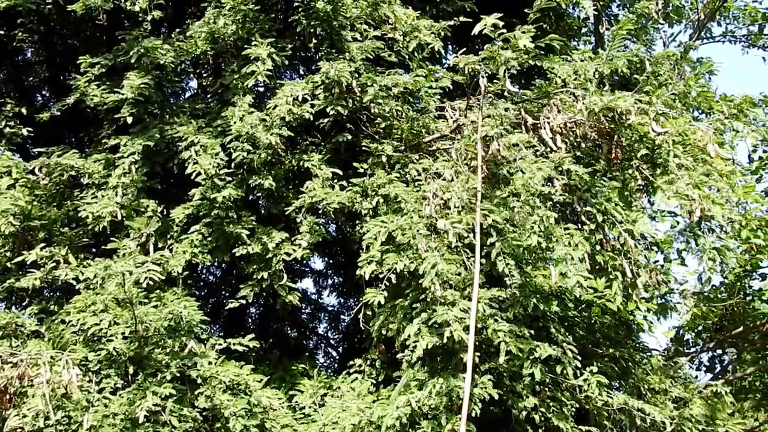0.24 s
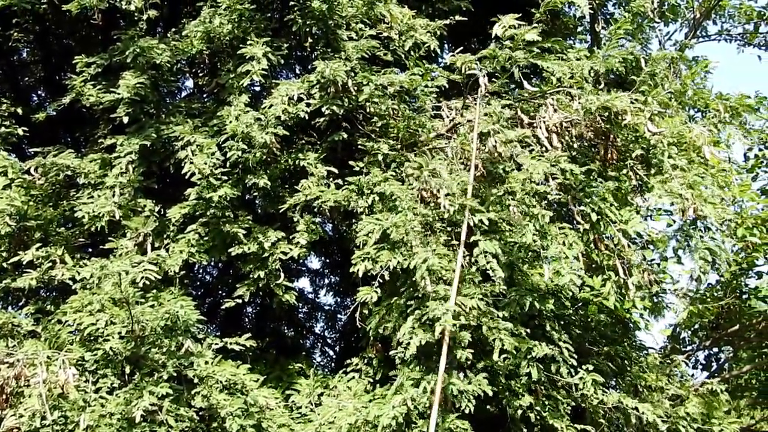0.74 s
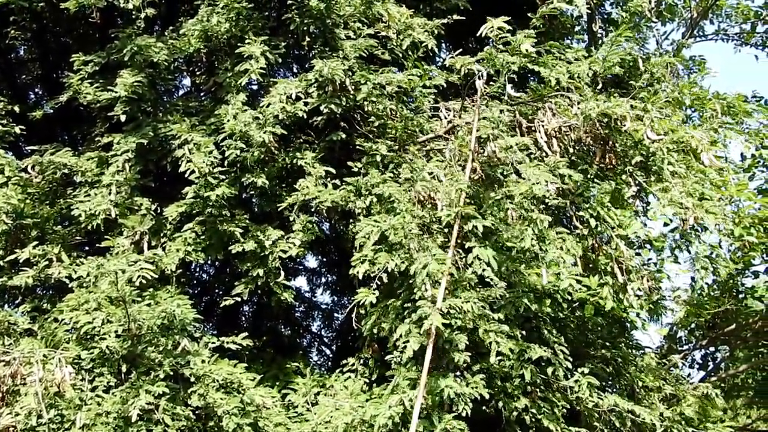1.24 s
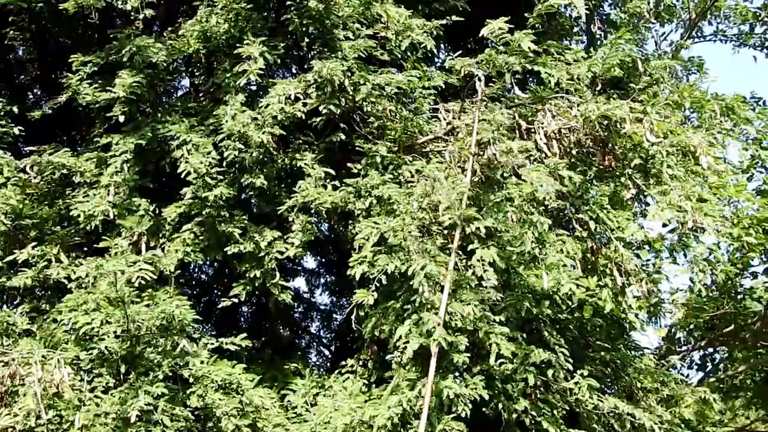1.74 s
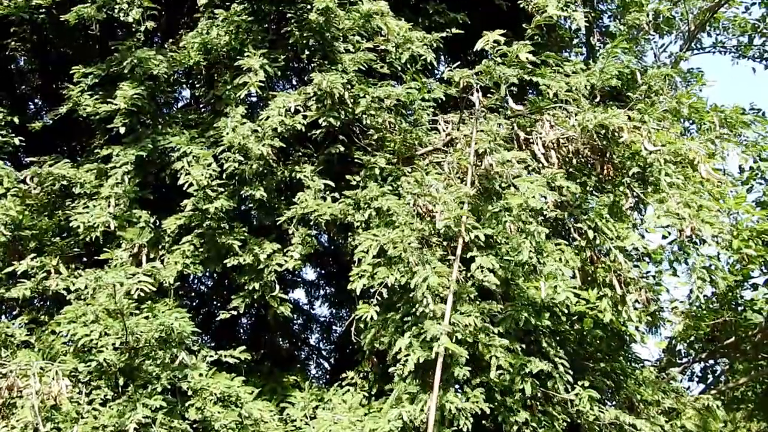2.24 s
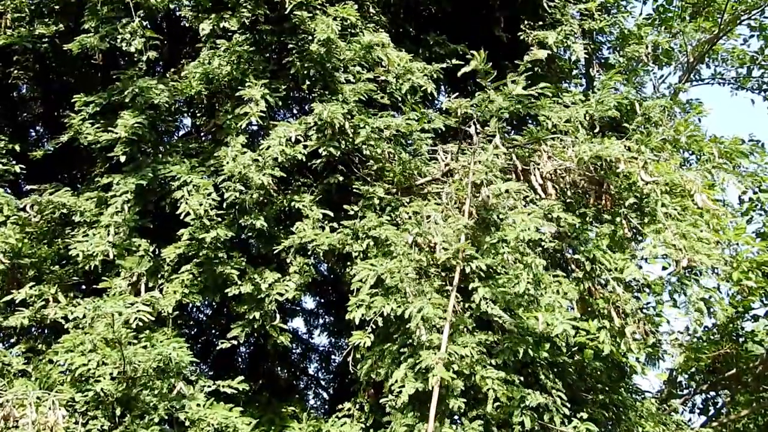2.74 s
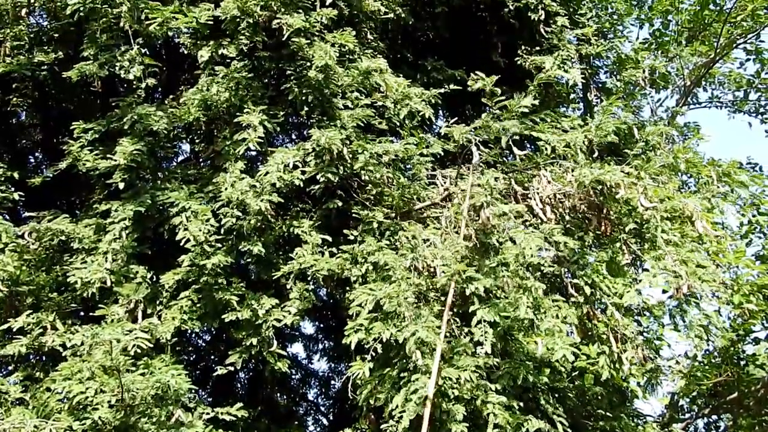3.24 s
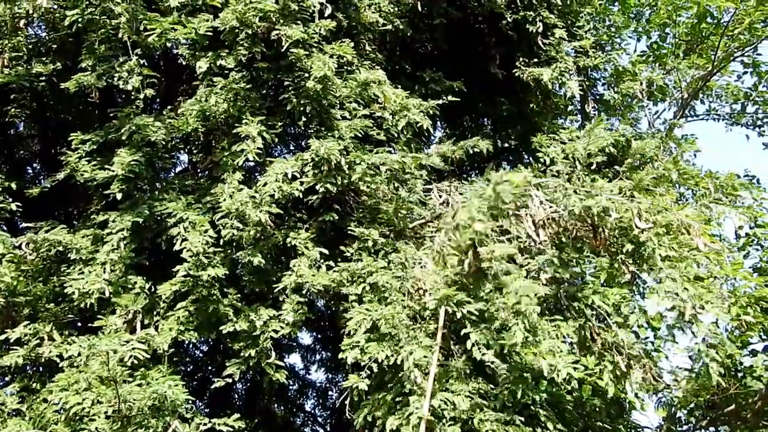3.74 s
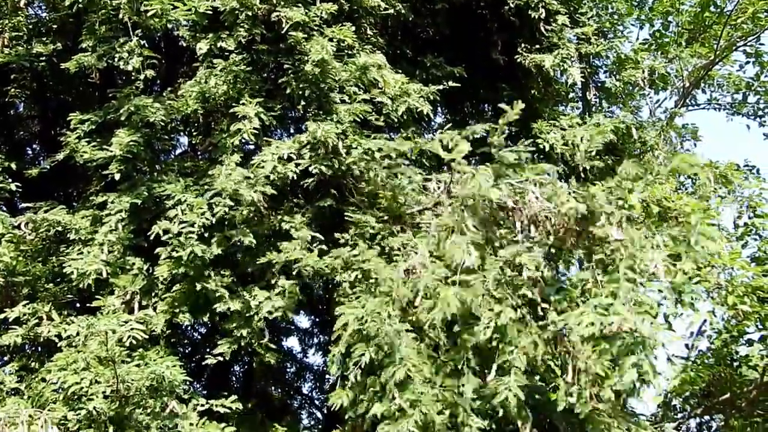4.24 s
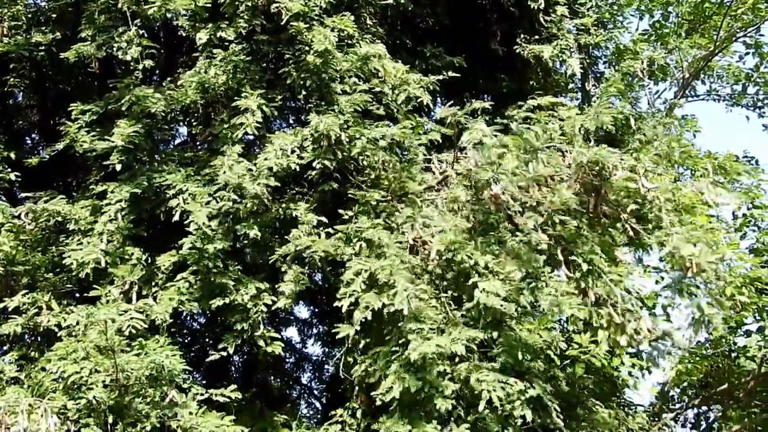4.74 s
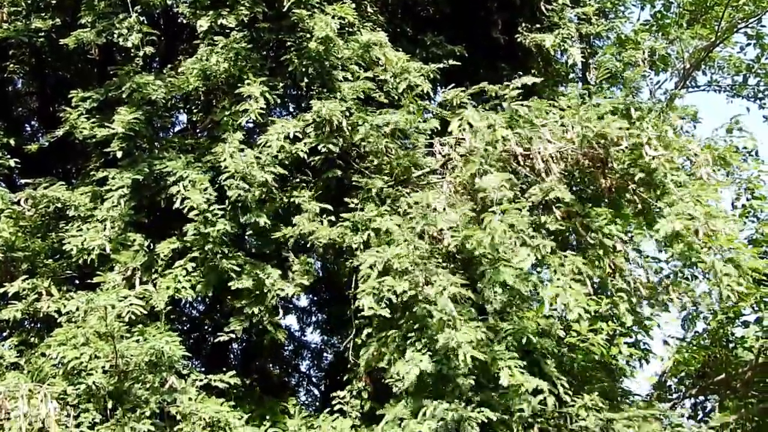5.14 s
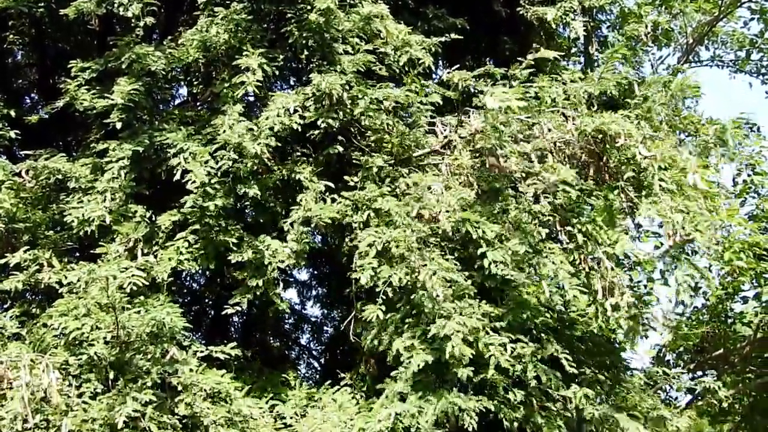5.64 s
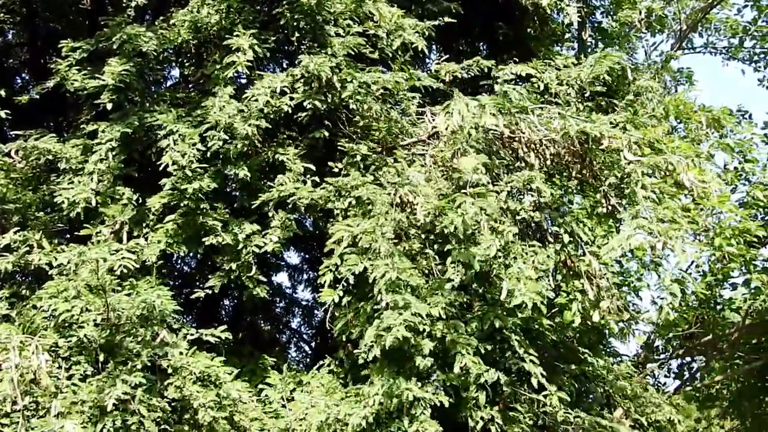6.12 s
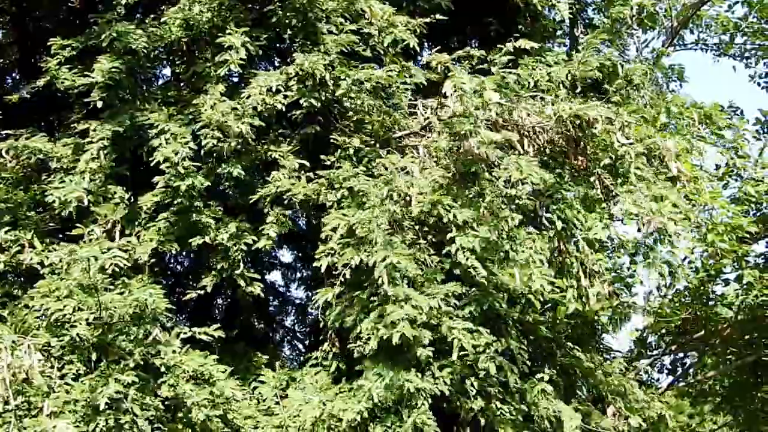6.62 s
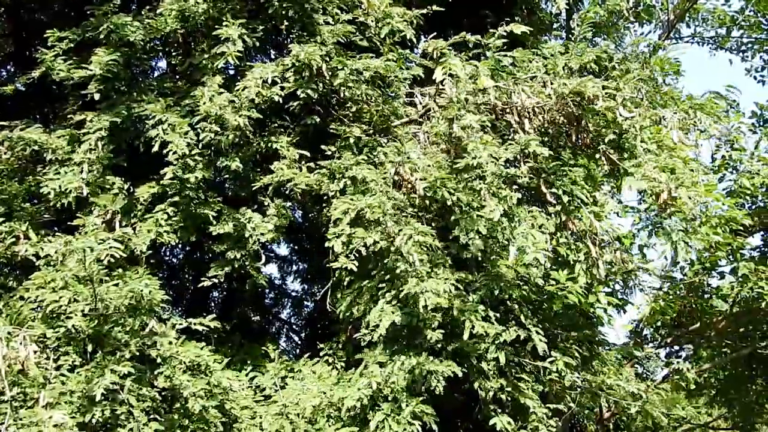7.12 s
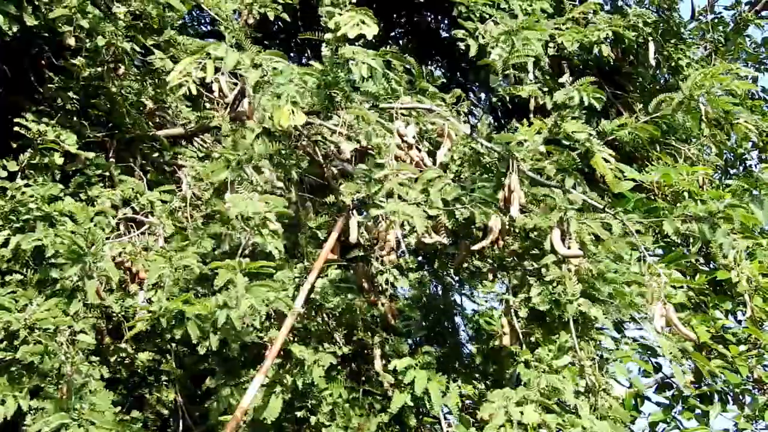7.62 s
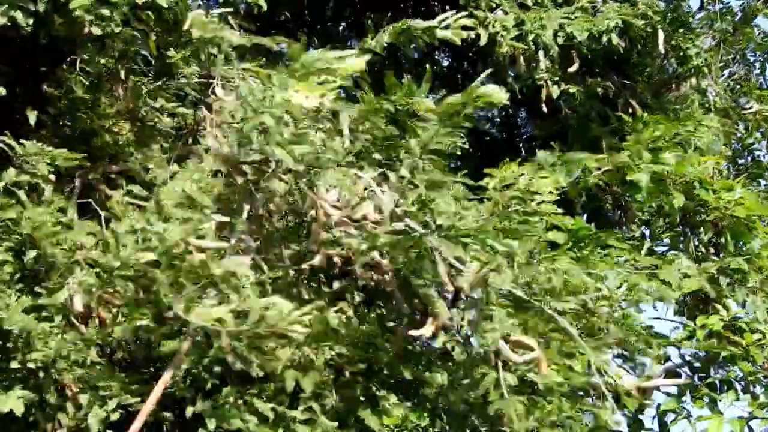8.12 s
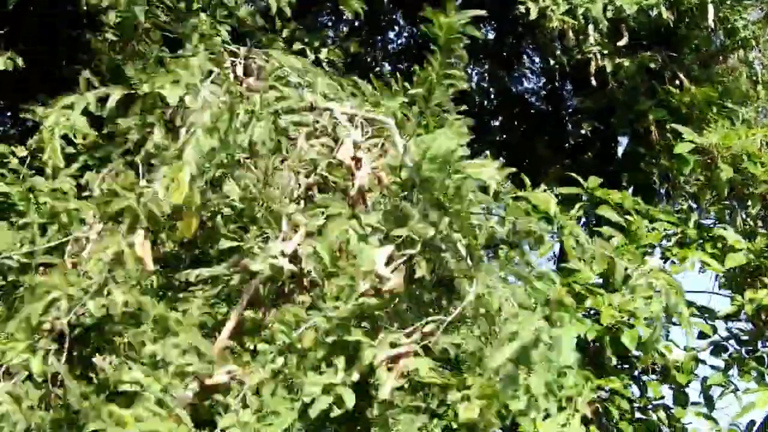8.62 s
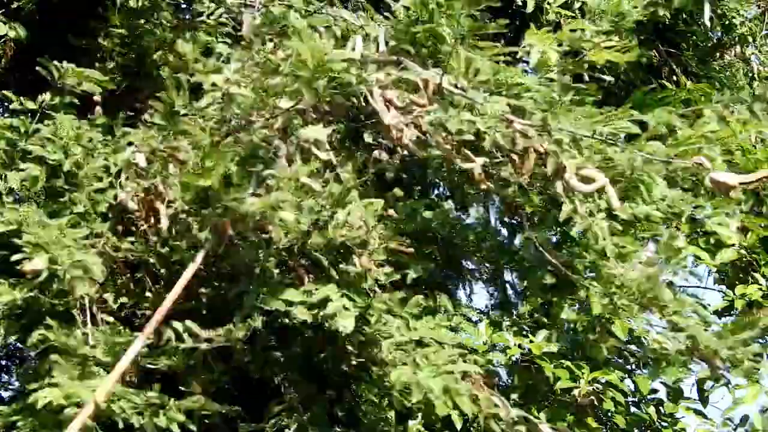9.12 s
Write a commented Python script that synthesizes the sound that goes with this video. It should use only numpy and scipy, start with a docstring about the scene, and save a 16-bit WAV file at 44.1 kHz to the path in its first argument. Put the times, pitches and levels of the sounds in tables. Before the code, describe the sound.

A long bamboo pole scrapes and knocks hollowly through a leafy tree crown, leaves hissing, over a thin cicada drone and sparse birdsong.

```python
"""Throughout: a cicada band, air noise and a far rumble. From 0 s birds whistle, chirp and call as shaped sine tones,
while a long bamboo pole pushed through a leafy crown scrapes (dense slips) and hisses in the leaves (fine ticks).
1.4 s: the pole creaks in dull pulses. 1.7-3.6 s: an insect trills; at 3.5 s a bird rasps in a noise burst.
3.4-9.3 s: knocks; each sends a click and a hollow tok down the pole, then a crack through the air.
7.37 s: the sound drops out for a quarter of a second; the rumble is stronger afterwards."""
import sys
import numpy as np
from scipy import signal
from scipy.fft import rfft, irfft, next_fast_len
from scipy.io import wavfile

SR = 44100
rng = np.random.default_rng(int(sys.argv[2]) if len(sys.argv) > 2 else 0)


def int16_out(signal):
    """Quantize to a 16-bit WAV file."""
    q = np.round(np.clip(np.atleast_2d(signal).T, -1, 1) * 32767)
    wavfile.write(sys.argv[1], SR, q.astype(np.int16))


N = 413211  # samples
TIME_S = np.arange(N) / SR
BLOW_S = np.arange(SR // 8) / SR
CONTROL_S = np.arange(0, N / SR + .001, .001)

# far rumble: t/s, level/dB
RUMBLE_LEVEL = [(0, -51.5), (2.5, -49.5), (3.3, -52.5), (7.3, -51), (7.65, -43), (9.37, -46.5)]
# spectra, relative: f/Hz, level/dB
RUMBLE_SPECTRUM = [(20, -29), (38, -18), (57, 2), (90, -2), (130, -10.5), (210, -13.5), (350, -25),
                   (700, -18.5)]
AIR_SPECTRUM = [(120, 8), (220, 3.5), (350, -3), (500, -2.5), (800, 0), (1400, -4), (2000, -7.5),
                (3800, -11), (4700, -2), (5600, -12.5), (8000, -19.5), (11000, -25), (15500, -31.5)]
CICADA_SPECTRUM = [(5400, -37), (5900, -7), (6250, 3), (6580, 5.5), (7000, 3), (7250, -3.5), (7600, -27.5),
                   (8500, -31)]
RASP_SPECTRUM = [(4600, -31), (5400, -4.5), (5800, -3), (6700, 1), (7100, -6.5), (7700, -35)]
LEAF_SPECTRUM = [(300, -13), (1000, -10), (2500, -8), (4200, -3.5), (5500, 0.5), (6700, 5), (7500, -4.5),
                 (8500, -12), (10000, -19), (12000, -27), (15500, -41)]
SCRAPE_SPECTRUM = [(100, -13), (350, -10.5), (700, 3.5), (1000, 5.5), (1700, 0), (2600, -10.5),
                   (3500, -4.5), (5000, -6.5), (9000, -49)]
CRACK_SPECTRUM = [(2500, -30.5), (3900, -5.5), (5000, -2), (6500, -2), (8000, -17.5), (11000, -30.5),
                  (13000, -46), (15500, -56)]
# cicada chorus: t/s, level/dB
CHORUS_LEVEL = [(0, -47.5), (2, -48), (3.2, -47), (5.8, -47.5), (7.3, -47.5), (7.65, -45), (9.37, -46.5)]
# trilling insect: t/s, f/Hz, level/dB
INSECT_TRILL = [(0, 4340, -90), (1.7, 4400, -71), (2.3, 4600, -53.5), (2.7, 4610, -54), (3.05, 4660, -53),
                (3.54, 4640, -50), (3.62, 4630, -80.5), (5.3, 4670, -75), (9.37, 4600, -90)]
# songbird whistles: t/s, length/s, start f/Hz, middle f/Hz, end f/Hz, level/dB
WHISTLES = [(0, 0.049, 2870, 3080, 3270, -53.5), (0, 0.068, 5130, 5370, 5430, -51.5),
            (.212, .24, 4300, 5060, 5020, -52), (0.514, 0.17, 3580, 3987, 3390, -50.5),
            (0.793, 0.15, 3315, 3600, 3840, -54), (4.691, .03, 1860, 2010, 2150, -51),
            (4.768, 0.037, 2460, 2196, 2030, -52), (5.361, 0.19, 3840, 3480, 3410, -56.5),
            (5.68, 0.16, 3230, 2990, 3120, -59), (5.797, 0.059, 3280, 3580, 3830, -52.5),
            (5.98, .24, 3900, 4190, 4880, -53.5), (6.551, .09, 3730, 3860, 4350, -51),
            (6.76, 0.14, 4940, 3890, 3400, -50.5)]
# songbird chirps: t/s, level/dB
CHIRPS = [(.99, -59), (1.08, -50), (1.275, -52.5), (1.46, -61), (2.16, -59), (2.52, -57.5), (2.62, -61),
          (3.16, -62), (3.275, -51), (3.438, -53), (6.422, -49.5), (6.64, -51.5)]
# course of one chirp: share of length/1, f/Hz, level/dB relative
CHIRP_SHAPE = [(0, 2750, -20), (.17, 3080, -1), (.33, 3700, -11), (.48, 4500, -12), (.66, 3200, -1),
               (.85, 2680, 0), (1, 2400, -14)]
# far bird's repeated falling call: t/s, level/dB
FALLING_CALLS = [(0.269, -55), (.98, -56), (1.96, -54)]
# larger far birds: t/s, length/s, start f/Hz, middle f/Hz, end f/Hz, level/dB, octave overtone/dB relative
CALLS = [(1.36, .44, 850, 780, 780, -51, -10), (1.8, .68, 1640, 1790, 1660, -59.5, -25),
         (2.05, .22, 770, 760, 720, -53.5, -4), (5.9, .2, 240, 220, 212, -53, -20),
         (6.12, .11, 285, 275, 305, -46.5, -22), (6.38, .82, 1055, 995, 1060, -58, 0)]
# early reflections off trunks and ground: left delay/s, right delay/s, level/dB
ECHOES = [(.017, .017, -17.5), (0.027, 0.02, -41.5), (0.075, 0.09, -35)]
# pushes of the pole through the crown: t/s, length/s, scrape/dB, leaf hiss/dB (both before a fixed source gain)
PUSHES = [(0.189, 0.08, -48.5, -66), (0.773, 0.084, -54, -62.5), (1.045, 0.11, -51.5, -66.5),
          (1.29, 0.15, -49.5, -57.5), (1.943, .55, -57.5, -72.5), (2.562, .03, -56, -75),
          (2.96, 0.75, -55.5, -66), (3.926, 0.052, -25, -45), (4.03, 0.16, -49.5, -53),
          (4.221, 0.11, -43, -51), (4.457, 0.18, -42.5, -56.5), (5.125, 0.0098, -36, -40.5),
          (5.347, 0.34, -62, -64), (6.096, 0.175, -48.5, -66), (6.34, 0.42, -52.5, -65),
          (6.977, .13, -56, -76), (7.284, 0.044, -66, -75), (7.642, 0.42, -51, -70),
          (8.022, 0.37, -47.5, -56.5), (8.159, 0.021, -30, -51), (8.343, 0.72, -49.5, -56.5),
          (9.152, 0.23, -44, -57)]
# modes of the pole: f/Hz, peak gain/dB, t60/s
POLE_MODES = [(812, -12, .1), (971, 0, .14), (1020, -5, .08), (1262, -1, .16), (1467, -3, .1),
              (1598, -3, .1), (1775, 6, .2), (1817, 3, .16), (2390, -7, .1), (2612, 1, .18), (2653, 2, .18),
              (3383, -2, .14), (3580, 1, .16), (3670, -4, .14), (3987, 2, .16)]
# slips of the bending pole: t/s, f/Hz, level/dB (energy of 10 ms)
CREAKS = [(1.350, 524, -35), (1.371, 610, -33), (1.388, 580, -35.5), (1.428, 577, -34.5)]
# jolts of the whole pole: t/s, f/Hz, level/dB (energy of 10 ms)
THUDS = [(3.927, 280, -37), (5.0099, 284, -30), (5.117, 127.5, -25), (5.503, 130, -38), (7.093, 190, -40.5),
         (7.363, 280, -44), (7.811, 180, -36), (9.204, 200, -38)]
# pole on branch: t/s, click/dB, click f/Hz, tok/dB, tok f/Hz, air crack/dB, ringing drive/dB relative
# (levels: energy of 10 ms)
KNOCKS = [(3.3877, -47, 2400, -54, 800, -46, 12), (3.553, -45, 1730, -34, 1016, -60, 7.5),
          (3.644, -51, 2000, -51, 990, -59, 7), (3.9218, -27, 1800, -36, 880, -44, -9),
          (3.950, -17.5, 1620, -27, 1100, -24.5, 3), (3.9715, -30, 2180, -55, 990, -37, 18),
          (3.995, -25.5, 2500, -55, 915, -29, 8), (4.032, -33, 2440, -48, 923, -32, 6),
          (4.2687, -33, 2160, -63, 960, -36, 14.5), (4.3427, -46, 2100, -38, 873, -49, 9),
          (4.4041, -34.5, 2580, -49, 900, -38, 4), (4.4422, -39.5, 2190, -40.5, 918, -39, 4),
          (4.4653, -35.5, 2600, -58, 844, -44, 13), (4.5124, -34, 2290, -42, 914, -54, 11),
          (4.554, -40, 2400, -57, 1040, -58, 4), (4.6105, -41, 1800, -37, 950, -63, -11),
          (5.0096, -42, 1780, -42.5, 776, -36.5, 0), (5.1096, -19, 1750, -26, 861, -30, -1),
          (5.1138, -17, 1870, -28, 933, -19.5, -29), (5.501, -39.5, 2670, -42, 895, -36.5, 3),
          (5.6187, -44, 3000, -64, 915, -39.5, 11), (6.2263, -48, 2100, -52, 940, -62, 16),
          (6.2836, -43, 2100, -43, 1094, -49, 8), (6.374, -45.5, 2300, -61, 980, -55, 9.5),
          (6.557, -43.5, 2150, -48.5, 947, -44.5, 10), (6.9737, -40.5, 1855, -32, 807, -42.5, 2.5),
          (7.0898, -50, 2200, -38, 724, -46.5, 4), (7.363, -42, 2470, -31.5, 802, -56, -8),
          (7.8329, -51.5, 1900, -39, 730, -54, 12.5), (8.074, -40, 2000, -39.5, 854, -34, 10.5),
          (8.132, -28, 2000, -25.5, 1002, -41, -19), (8.1542, -28.5, 1790, -48, 940, -32, -9),
          (8.1757, -25, 1960, -25.5, 1000, -39, -1), (8.2725, -29.5, 1850, -30.5, 1040, -39.5, 2),
          (8.3645, -26, 2220, -33.5, 988, -45, -8), (8.3814, -48, 1830, -41, 908, -49, 14),
          (8.5244, -37.5, 2050, -38.5, 998, -49, 2.5), (8.6458, -52, 2300, -57, 850, -33.5, -2),
          (8.9081, -56, 2200, -49, 914, -35, 5), (9.0395, -41.5, 2700, -52, 988, -41, -3),
          (9.161, -45.5, 1850, -46, 907, -58, -10), (9.2217, -32, 1710, -30.5, 1037, -50, -4),
          (9.316, -37, 1720, -34, 993, -48, 2)]
# dropout: start t/s, end t/s
DROPOUT = (7.371, 7.621)

CUTOFF_HZ = 15550
CHIRP_LENGTH_S = .075
FALL_LENGTH_S, FALL_START_HZ, FALL_MIDDLE_HZ, FALL_END_HZ = .24, 1225, 1150, 1000
# rasp slopes: time per 20 dB
RASP_AT_S, RASP_LENGTH_S, RASP_DB, RASP_ATTACK_S, RASP_RELEASE_S = 3.53, 0.07, -33, 0.032, 0.12
# push slopes, time per 20 dB; longer pushes swell more slowly
PUSH_ATTACK_S, ATTACK_SHARE_OF_LENGTH = 0.052, 0.42
# scraping stops with the pole; leaves follow late and sway on
SCRAPE_RELEASE_S, LEAF_RELEASE_S, LEAF_LAG_S = 0.027, 0.14, .015
# between pushes the pole still leans in the foliage
REST_SCRAPE_DB, REST_LEAF_DB = -60, -76
# struck farther up the pole: higher tok, longer lag behind the click
NEAR_TOK_HZ, TOK_LAG_S_PER_OCTAVE = 800, 0.01173


def from_db(db):
    """Decibels to gain."""
    return 10 ** (np.asarray(db) / 20)


def rms_one(x):
    """Scale to rms 1."""
    return x / np.sqrt(np.mean(x ** 2) + 1e-20)


def in_time(rows):
    """Columns of a time curve, interpolated at every sample."""
    s, *columns = np.transpose(rows)
    return [np.interp(TIME_S, s, column) for column in columns]


def band(x, low_hz, high_hz, order=2):
    """Causal Butterworth band-pass."""
    edges_hz = [low_hz, min(high_hz, SR / 2 - 100)]
    return signal.sosfilt(signal.butter(order, edges_hz, "band", fs=SR, output="sos"), x + 1e-18)


def coloured(x, spectrum):
    """Impose a smooth spectrum, 20 dB/octave beyond its ends; rms 1."""
    hz, db = np.transpose(spectrum)
    size = next_fast_len(x.shape[-1], True)
    f_hz = np.maximum(np.fft.rfftfreq(size, 1 / SR), 1)
    skirts_db = -20 * np.abs(np.log2(f_hz / np.clip(f_hz, hz[0], hz[-1])))
    gain = from_db(np.interp(np.log(f_hz), np.log(hz), db) + skirts_db)
    return rms_one(irfft(rfft(x, size) * gain, size)[..., :x.shape[-1]])


def drift(knots_per_s):
    """Random curve: normal knots of spread 1 joined by lines."""
    knots = rng.standard_normal(8192)
    return np.interp(TIME_S * knots_per_s, np.arange(len(knots)), knots)


def spread(pair, side_db):
    """Two unrelated signals as middle and side of a stereo sound; rms 1."""
    return rms_one(pair[0] + from_db(side_db) * pair[1] * np.array([[1], [-1]]))


def noise(spectrum, side_db):
    """Steady coloured stereo noise; rms 1."""
    return coloured(spread(rng.standard_normal((2, N)), side_db), spectrum)


def grains(per_s, size_db):
    """Two trains of random clicks of uneven size and either sign; rms 1."""
    sizes = from_db(size_db * np.minimum(rng.exponential(1, (2, N)), 4))
    signs = rng.choice([-1, 1], (2, N))
    return rms_one(sizes * signs * (rng.random((2, N)) < per_s / SR))


def add(track, s, sound):
    """Mix a sound into a track at a time."""
    at = max(int(s * SR), 0)
    track[..., at:at + sound.shape[-1]] += sound[..., :N - at]


def swell(start_s, length_s, attack_s, release_s):
    """Attack, hold, release in dB below the top; slopes in time per 20 dB."""
    early_s = np.maximum(start_s - CONTROL_S, 0)
    late_s = np.maximum(CONTROL_S - start_s - length_s, 0)
    return -20 * (early_s / attack_s + late_s / release_s)


def grove(x, t60_s):
    """Trunks and foliage scatter a diffuse tail, different at each ear."""
    t = TIME_S[:SR]
    decay = from_db(-60 * t / t60_s) * (1 - np.exp(-t / 0.0013))
    tail = band(rng.standard_normal((2, SR)), 200, 7800, order=1) * decay
    return signal.fftconvolve(np.atleast_2d(x), rms_one(tail) / np.sqrt(SR), axes=1)[:, :N]


def echoes(x):
    """Trunks and ground return a few distinct early reflections."""
    out = np.zeros((2, N))
    for left_s, right_s, db in ECHOES:
        add(out[0], left_s, from_db(db) * x[0])
        add(out[1], right_s, from_db(db) * x[1])
    return out


def far_rumble():
    """Low noise, level wandering about a slow course."""
    steady = noise(RUMBLE_SPECTRUM, side_db=-16)
    return steady * from_db(in_time(RUMBLE_LEVEL)[0] + 1.7 * drift(8.0))


def air_noise():
    """Broad noise with a slightly wandering level."""
    return noise(AIR_SPECTRUM, side_db=-4.5) * from_db(-53.0 + 1.5 * drift(3.1))


def cicada_chorus():
    """Many cicadas blur into one noise band."""
    return noise(CICADA_SPECTRUM, side_db=-1.5) * from_db(in_time(CHORUS_LEVEL)[0] + .5 * drift(25))


def insect_trill(pulses_hz=38.6):
    """A tone in even pulses, each falling in pitch, plus its scattered tail."""
    hz, db = in_time(INSECT_TRILL)
    beat = 2 * np.pi * pulses_hz * TIME_S
    pulse_hz = hz * (1 - .025 * np.sin(beat) + .014 * drift(900))
    tone = np.sin(2 * np.pi * np.cumsum(pulse_hz) / SR)
    trill = from_db(db + 1.5 * drift(23)) * rms_one(tone * (1 + np.cos(beat)) ** 2.0)
    return from_db(-1.5) * trill + from_db(-8.0) * grove(trill, t60_s=0.26)


def bird_rasp():
    """A short harsh noise burst with a fast flickering level."""
    course_db = swell(RASP_AT_S, RASP_LENGTH_S, RASP_ATTACK_S, RASP_RELEASE_S)
    level_db = RASP_DB + np.interp(TIME_S, CONTROL_S, course_db)
    return noise(RASP_SPECTRUM, side_db=2.5) * from_db(level_db + 2 * drift(230))


def note(length_s, start_hz, middle_hz, end_hz, overtone_db, waver, flutter_db=2):
    """A bird's note bends through three pitches: long ones in an arch, short ones with a sharp turn."""
    u = np.linspace(0, 1, int(length_s * SR))
    turns = [0, .5, 1], [start_hz, middle_hz, end_hz]
    hz = np.interp(u, *turns) if length_s < .1 else np.polyval(np.polyfit(*turns, 2), u)
    knots = rng.standard_normal((2, 256))
    quiver, flutter = [np.interp(u * length_s * 120, np.arange(256), row) for row in knots]
    phase = 2 * np.pi * np.cumsum(hz * (1 + waver * quiver)) / SR
    envelope = np.sqrt(np.abs(np.sin(np.pi * u))) * from_db(flutter_db * flutter)
    return rms_one(envelope * (np.sin(phase) + from_db(overtone_db) * np.sin(2 * phase)))


def chirp(length_s):
    """The pitch shoots up and falls back, varying each time; the low flanks are loudest."""
    share, hz, db = np.transpose(CHIRP_SHAPE)
    hz_change, db_change = rng.standard_normal((2, len(share))) * [[.02], [2.5]]
    u = np.linspace(0, 1, int(length_s * SR))
    phase = 2 * np.pi * np.cumsum(np.interp(u, share, hz * (1 + hz_change))) / SR
    return rms_one(from_db(np.interp(u, share, db + db_change)) * np.sin(phase))


def birds():
    """A songbird in the trees and larger birds farther away, direct and scattered."""
    song = np.zeros(N)
    for s, length_s, *pitches_hz, db in WHISTLES:
        add(song, s, from_db(db) * note(length_s, *pitches_hz, overtone_db=-30.0, waver=.013))
    for s, db in CHIRPS:
        add(song, s, from_db(db) * chirp(CHIRP_LENGTH_S))
    for s, db in FALLING_CALLS:
        call = note(FALL_LENGTH_S, FALL_START_HZ, FALL_MIDDLE_HZ, FALL_END_HZ, overtone_db=-25, waver=0.022)
        add(song, s, from_db(db) * call)
    for s, length_s, *pitches_hz, db, overtone_db in CALLS:
        add(song, s, from_db(db) * note(length_s, *pitches_hz, overtone_db=overtone_db, waver=0.0154))
    return from_db(-3.5) * song + from_db(-3.5) * grove(song, t60_s=.5)


def pushing():
    """Scrape and leaf-hiss levels in dB: each push raises both from rest."""
    scrape_db, hiss_db = REST_SCRAPE_DB, REST_LEAF_DB
    for s, length_s, bark_db, leaf_db in PUSHES:
        attack_s = PUSH_ATTACK_S + ATTACK_SHARE_OF_LENGTH * length_s
        bark_course_db = bark_db + swell(s, length_s, attack_s, SCRAPE_RELEASE_S)
        leaf_course_db = leaf_db + swell(s + LEAF_LAG_S, length_s, attack_s, LEAF_RELEASE_S)
        scrape_db = np.maximum(scrape_db, bark_course_db)
        hiss_db = np.maximum(hiss_db, leaf_course_db)
    return np.interp(TIME_S, CONTROL_S, scrape_db), np.interp(TIME_S, CONTROL_S, hiss_db)


def leaves(hiss_db, body_db=14):
    """Leaflets and dry pods brush each other in clumps of fine ticks."""
    ticks = spread(grains(per_s=7000, size_db=0.5), side_db=-5.5) * from_db(2.87 * drift(70))
    return coloured(ticks, LEAF_SPECTRUM) * from_db(hiss_db + body_db)


def down_the_pole(x, slow_hz=900, width_hz=480, count=2):
    """Dispersive tube as all-passes: waves near cut-off come late, so a click becomes a falling chirp."""
    r = np.exp(-np.pi * width_hz / SR)
    a = [1, -2 * r * np.cos(2 * np.pi * slow_hz / SR), r * r]
    return signal.sosfilt([a[::-1] + a] * count, x + 1e-18)


def pole_ring(x):
    """Modes of the pole: two-pole resonators of alternating sign, gain set at the peak."""
    out = 0
    for k, (hz, db, t60_s) in enumerate(POLE_MODES):
        r = from_db(-60 / (t60_s * SR))
        b = np.array([1, 0, -1]) * (1 - r * r) / 2
        a = [1, -2 * r * np.cos(2 * np.pi * hz / SR), r * r]
        out = out + (-1) ** k * from_db(db) * signal.lfilter(b, a, x + 1e-18)
    return out


def twig_taps(scrape_db, tap_db=-7, low_hz=1300, high_hz=2800, ring_db=5):
    """Twigs flick the pole at random, as hard as it is being pushed."""
    flicks = rms_one(band(grains(per_s=110, size_db=1.8)[0], low_hz, high_hz))
    taps = down_the_pole(flicks * from_db(scrape_db + tap_db))
    return taps + from_db(ring_db) * pole_ring(taps)


def scraping(scrape_db, rub_db=-3.0, ring_db=9):
    """Bark catches on the pole in dense little slips; harder scraping drives the modes more strongly."""
    slips = spread(grains(per_s=900, size_db=2.4), side_db=-34) * from_db(3.1 * drift(110))
    rub = coloured(slips, SCRAPE_SPECTRUM) * from_db(scrape_db + rub_db)
    pressure_db = np.clip(.6 * (scrape_db + 32), -15, 0)
    return rub + from_db(ring_db) * pole_ring(rub * from_db(pressure_db))


def blow(sound, db):
    """Give a short sound the energy of 10 ms at this level."""
    energy = np.mean(np.sum(sound ** 2, axis=-1))
    return sound * from_db(db) * np.sqrt(SR / 100 / energy)


def creaks(decay_s=0.001, ring_db=-2):
    """Each slip of the bending pole is a dull pulse of a few cycles, which rings the modes."""
    out = np.zeros(N)
    for s, hz, db in CREAKS:
        pulse = np.sin(2 * np.pi * hz * BLOW_S) * BLOW_S ** 2 * np.exp(-BLOW_S / decay_s)
        add(out, s - .001, blow(pulse, db))
    return out + from_db(ring_db) * pole_ring(out)


def contact(grit, decay_s):
    """One sharp touch and a brief gritty slide."""
    slide = grit * rng.standard_normal(len(BLOW_S)) * np.exp(-BLOW_S / decay_s)
    return slide + (BLOW_S == 0)


def pole_click(touch, db, hz, wall_hz=3200, wall_db=1.0, wall_spread_octaves=0.18):
    """Band-passed touch plus a brief resonance of the tube wall, its pitch varied at random per knock."""
    ring_hz = wall_hz * 2 ** (wall_spread_octaves * rng.uniform(-1.1, 1))
    wall = from_db(wall_db) * band(touch, ring_hz / 1.06, ring_hz * 1.06, order=1)
    tick = band(band(touch, hz / 1.18, hz * 1.43, order=1), 1100, 3960, order=6)
    return down_the_pole(blow(tick + band(wall, 2200, 4060), db))


def air_crack(db, split_s=0.00023, crack_s=0.0029, splinter_s=.034, splinter_db=-19):
    """Noise burst with a sharp onset, a fast decay and a weak slower one."""
    pair = rng.standard_normal((2, len(BLOW_S)))
    fibres = coloured(spread(pair, side_db=-7.5), CRACK_SPECTRUM) * (1 - np.exp(-BLOW_S / split_s))
    decay = np.exp(-BLOW_S / crack_s) + from_db(splinter_db) * np.exp(-BLOW_S / splinter_s)
    return blow(fibres * decay, db)


def knocks(air_delay_s=.0105):
    """Click, tok and thud come down the pole; the crack from its tip comes later through the air."""
    pole, drive, air = np.zeros(N), np.zeros(N), np.zeros((2, N))
    for s, click_db, click_hz, tok_db, tok_hz, crack_db, ring_db in KNOCKS:
        touch = contact(grit=.1, decay_s=.003)
        click = pole_click(touch, click_db, click_hz)
        tok = down_the_pole(blow(band(touch, tok_hz / 1.3, tok_hz * 1.23), tok_db))
        tok_lag_s = TOK_LAG_S_PER_OCTAVE * max(np.log2(tok_hz / NEAR_TOK_HZ), 0)
        add(pole, s, click)
        add(pole, s + tok_lag_s, tok)
        # bouncing free, the pole rings more; pressed, less
        add(drive, s, from_db(ring_db) * (click + tok))
        add(air, s + air_delay_s, air_crack(crack_db))
    for s, hz, db in THUDS:
        add(pole, s, blow(band(contact(grit=0.061, decay_s=0.011), hz / 1.8, hz * 1.38), db))
    return pole + pole_ring(drive) + air


def scene():
    """Pole and leaves in front, wildlife and far rumble all round."""
    background = far_rumble() + air_noise()
    wildlife = cicada_chorus() + insect_trill() + bird_rasp() + birds()
    scrape_db, hiss_db = pushing()
    work = leaves(hiss_db) + twig_taps(scrape_db) + scraping(scrape_db) + creaks() + knocks()
    near = work + echoes(work) + from_db(-20.5) * grove(work, t60_s=0.21)
    return (background + wildlife + near) * from_db([[.3], [-.3]])  # left, right trim


def record(dry):
    """The sound drops out briefly; a steep low-pass cuts the top."""
    live = (TIME_S < DROPOUT[0]) | (TIME_S > DROPOUT[1])
    return signal.sosfilt(signal.ellip(10, .1, 80, CUTOFF_HZ, fs=SR, output="sos"), dry * live)


dry = scene()
out = record(dry)
int16_out(out)
```